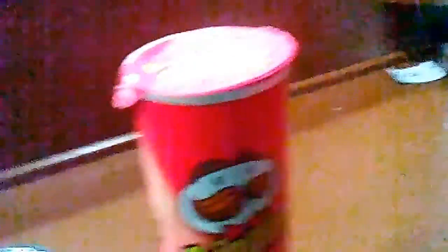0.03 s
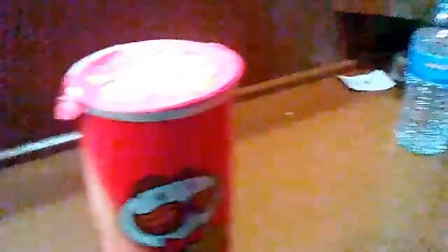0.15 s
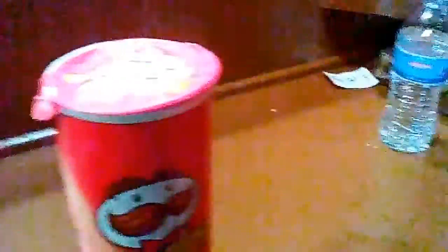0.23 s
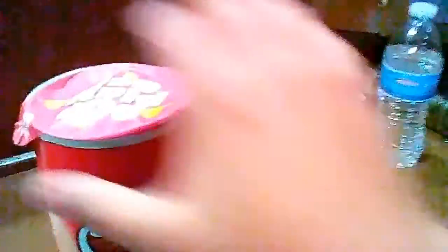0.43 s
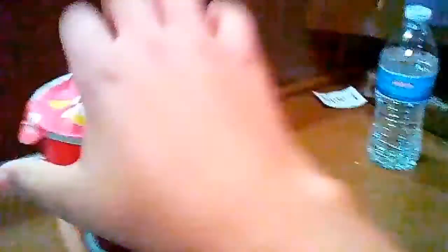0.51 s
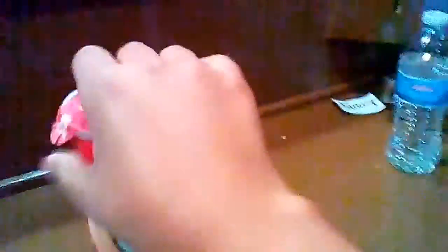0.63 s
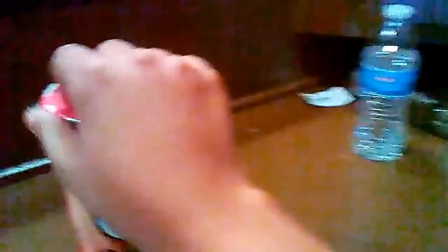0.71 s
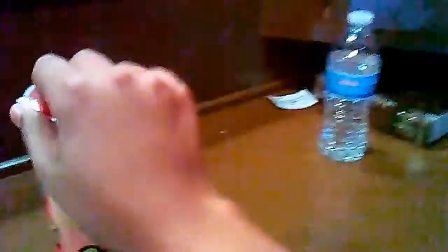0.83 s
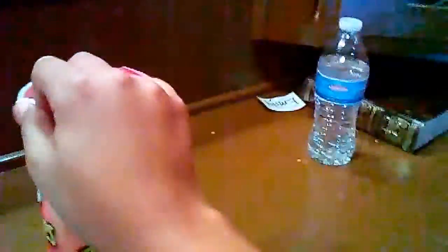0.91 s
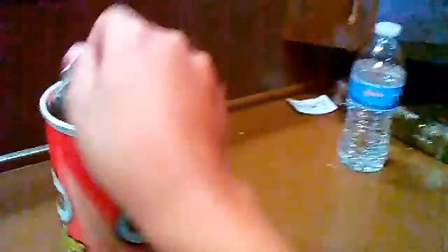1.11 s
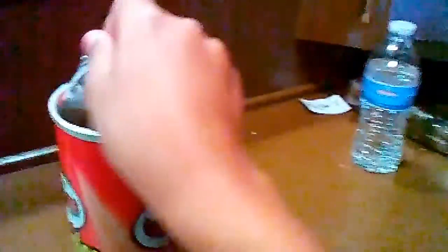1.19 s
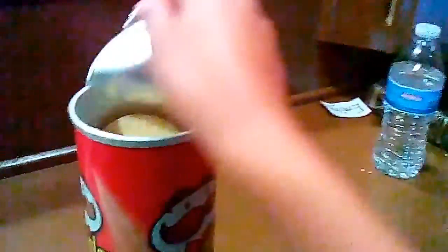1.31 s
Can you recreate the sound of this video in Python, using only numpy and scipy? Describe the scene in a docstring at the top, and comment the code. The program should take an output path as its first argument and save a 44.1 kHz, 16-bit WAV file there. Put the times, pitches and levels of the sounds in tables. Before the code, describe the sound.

Foil seal being ripped from a cardboard can, crinkling and squeaking, followed by clicking plastic and rustle

```python
"""A foil seal is torn off a cardboard snack can, close by in a small room: tiny random bursts crackle in the foil,
ring the stretched seal and drum the wall. Fading tones make the squeaks and the air ringing in the can.
Fingers rub the rim first, as fine slips through resonances; short decaying tones make the wall's hollow knocks.
The plastic lid snaps in sharp clicks of noise and ringing that linger in the room, while the foil rustles faintly.
Light slides of the lid, a soft rumble of the hand and a steady background noise lie underneath."""
import sys
import numpy as np
from scipy import signal
from scipy.fft import rfft, irfft, next_fast_len
from scipy.io import wavfile
from scipy.ndimage import map_coordinates

SR = 44100
rng = np.random.default_rng(int(sys.argv[2]) if len(sys.argv) > 2 else 0)


def waveform_to_disk(signal):
    """Save audio, clipped to [-1, 1], as 16-bit WAV at the path in sys.argv[1]."""
    frames = np.transpose(np.atleast_2d(signal))
    scaled = np.clip(frames, -1, 1) * 32767
    samples = np.round(scaled).astype(np.int16)
    wavfile.write(sys.argv[1], SR, samples)


N = 59535  # length [samples]

# tone colour of the crackling foil: (frequency [Hz], level [dB])
FOIL_COLOUR = [(40, -21), (120, -21), (300, -25), (650, -21), (1000, -13), (1400, -12), (1800, -8.5),
               (2400, -9), (3600, -6), (4500, -6), (5500, 1.5), (6700, -6.5), (7900, -22.5), (9500, -18.5),
               (11500, -26), (13000, -28)]
# resonances of the foil: (frequency [Hz], width [Hz], level [dB])
FOIL_RESONANCES = [(3980, 60, -1.5), (5070, 40, 11.5), (5200, 25, -1), (5580, 137, 0), (5680, 107, -1.5)]
FOIL_RING_DB = -8.5  # foil resonances against the crackle
SNAP_ATTACK_S = 0.00075  # shared by the snaps and their echo


def amp(db):
    """Turn decibels into a gain."""
    return 10 ** (np.asarray(db) / 20)


def unit(x):
    """Scale x to an average strength (rms) of 1."""
    return x / np.sqrt(np.mean(x ** 2) + 1e-20)


def along(points, hz):
    """Read a curve of (frequency [Hz], value) points on a logarithmic frequency axis."""
    point_hz, value = np.transpose(points)
    return np.interp(np.log(hz + 1), np.log(point_hz + 1), value)


def level(points):
    """Gain per sample from (time [s], level [dB]) points, practically silent outside them."""
    s, db = np.transpose(points)
    return amp(np.interp(np.arange(N) / SR, s, db, left=-120, right=-120))


def filtered(x, response):
    """Multiply the spectrum of x by a response of frequency."""
    size = 2 * next_fast_len(N)  # spare room, so that the end does not wrap onto the start
    spectrum = rfft(x, size) * response(np.fft.rfftfreq(size, 1 / SR))
    return irfft(spectrum, size)[..., :N]


def coloured(x, points):
    """Shape x by (frequency [Hz], level [dB]) points with unit power and no sound ahead of its cause."""
    def response(hz):
        cepstrum = irfft(np.log(unit(amp(along(points, hz)))))
        # folding the second half onto the first makes the filter minimum-phase
        cepstrum[1:len(cepstrum) // 2] *= 2
        cepstrum[len(cepstrum) // 2 + 1:] = 0
        return np.exp(rfft(cepstrum))
    return filtered(x, response)


def resonate(x, modes):
    """Send x through side-by-side resonances: (frequency [Hz], width [Hz], level [dB])."""
    def response(hz):
        total = 0
        for k, (centre, width, db) in enumerate(modes):
            damping = 1j * hz * width
            sign = (-1) ** k  # neighbours alternate in sign
            total = total + sign * amp(db) * damping / (centre ** 2 - hz ** 2 + damping)
        return total
    return filtered(x, response)


def wobble(rate):
    """A smooth random curve with the given number of random points a second."""
    knots = rng.standard_normal(int(N * rate / SR) + 4)
    return map_coordinates(knots, [np.arange(N) * rate / SR])


def slips(per_s, spread_db):
    """Tiny irregular stick-slip impulses of uneven size, as a mid (centre) and a side (width) row."""
    size = amp(spread_db * np.minimum(rng.exponential(size=N), 4))
    happens = rng.random(N) < per_s / SR
    return unit(happens * size * rng.choice([-1, 1], (2, N)))


def dying(s, t60, attack):
    """Envelope of a blow at time s [s]: a quick rise, then a fall of 60 dB in t60 [s]."""
    t = np.maximum(np.arange(N) / SR - s, 0)
    return (1 - np.exp(-t / attack)) * 10 ** (-3 * t / t60)


def ring(s, hz, t60, attack):
    """One resonance struck at time s [s]: a dying sine."""
    return dying(s, t60, attack) * np.sin(2 * np.pi * hz * (np.arange(N) / SR - s))


def wavering(hz, rough, flutter):
    """A tone of rms 1 whose strength and phase waver, with a faster flutter in strength."""
    phase = 2 * np.pi * np.cumsum(hz * np.ones(N)) / SR
    strength = 1 + rough * wobble(43.64) + flutter * wobble(160)
    return unit(strength * np.sin(phase) + rough * wobble(45.1) * np.cos(phase))


def centred(x):
    """Put a sound in the mid row only."""
    return np.outer([1, 0], x)


def room(x, wet_db):
    """Add echoes of the mid: a spread-out noise tail in which each frequency dies at its own speed."""
    # how long the echoes last: (frequency [Hz], time to fall 60 dB [s])
    echo_times = [(100, 0.3), (1000, 0.3), (4000, 0.38), (7000, 0.3), (13000, 0.42)]
    delay_s = 0.0039
    hz, t, z = signal.stft(rng.standard_normal((2, SR // 2)), SR, nperseg=256)
    fade = amp(-60 * t / along(echo_times, hz)[:, None])
    tail = signal.istft(z * fade, SR, nperseg=256)[1]
    # silent for one delay, then fading in over another
    tail = tail * np.clip(np.arange(tail.shape[1]) / SR / delay_s - 1, 0, 1)
    echoes = signal.fftconvolve(x[:1], tail / np.linalg.norm(tail[0]), axes=1)[:, :N]
    return x + amp(wet_db) * echoes


def background():
    """Steady random noise with a fixed tone colour."""
    # colour of the background: (frequency [Hz], level [dB])
    floor_colour = [(25, -2), (100, 1), (300, 0.5), (1000, 1), (3000, -9), (6000, 3.5), (8000, -25),
                    (13000, -37)]
    return amp(-63.5) * coloured(rng.standard_normal((2, N)), floor_colour)


def hand():
    """The grip shifts and the can rumbles softly: noise through low resonances."""
    # rumble of the hand on the can: (time [s], level [dB])
    hand_level = [(.02, -87.5), (.08, -64.5), (.17, -67), (.22, -59), (.3, -57), (.42, -50), (.5, -64.5),
                  (.66, -69), (.76, -102), (.92, -75), (1.08, -54.5), (1.14, -101)]
    # its resonances: (frequency [Hz], width [Hz], level [dB])
    hand_modes = [(55.7, 29, -5.5), (101, 33, 3.5), (158, 64, 3)]
    return level(hand_level) * unit(resonate(rng.standard_normal((2, N)), hand_modes))


def lid_slides():
    """Plastic glides on the rim: fine slips make a thin hiss that swells fast and fades."""
    # slides of the lid: (start [s], length [s], level [dB])
    slides = [(-.03, 0.19, -57.5), (0.746, 0.17, -42.5)]
    # resonances of the hiss: (frequency [Hz], width [Hz], level [dB])
    slide_modes = [(1830, 490, -9.5), (3150, 210, -14.5), (5540, 570, -0.5), (6150, 380, 3),
                   (9850, 220, -12.5)]
    stroke = np.zeros(N)
    for s, length, db in slides:
        stroke += level([(s, db - 6.0), (s + 0.28 * length, db),
                         (s + 0.65 * length, db - 11.5), (s + length, db - 16)])
    return stroke * unit(resonate(slips(per_s=8000, spread_db=-1.5), slide_modes))


def foil_rustle():
    """Loose foil crinkles softly in tiny impulses and rings faintly."""
    # rustling: (time [s], level [dB])
    rustle_level = [(.87, -81), (.9, -38), (.94, -59), (.98, -33.5), (1.02, -62), (1.05, -50),
                    (1.14, -45.5), (1.2, -91), (1.25, -52.5), (1.275, -60), (1.288, -45), (1.308, -45),
                    (1.35, -52.5)]
    crinkles = slips(per_s=2900, spread_db=0.5)
    ringing = amp(FOIL_RING_DB) * unit(resonate(crinkles, FOIL_RESONANCES))
    return level(rustle_level) * (unit(coloured(crinkles, FOIL_COLOUR)) + ringing)


def rim_rub():
    """Fine slips ring the rim, whose resonances rise slightly as the grip slides."""
    # rubbing on the rim: (time [s], level [dB])
    rub_level = [(0, -58.5), (.035, -55), (.055, -42.5), (.085, -35.5), (.115, -33), (.16, -36.5),
                 (.19, -36.5), (.23, -67)]
    # resonances of the rim: (frequency [Hz], width [Hz], level [dB])
    rim_modes = [(590, 85, -8.5), (928, 46, -1), (1250, 97, 3.5), (1750, 104, -5.5), (2336, 240, -4),
                 (4096, 155, -1.5), (5400, 110, 5.5), (6260, 480, -14), (6890, 270, -9)]
    glide_per_s, waver = 0.08, 0.0018  # fractions of the pitch
    rub = unit(resonate(slips(per_s=5000, spread_db=2.0), rim_modes))
    t = np.arange(N) / SR - rub_level[4][0]
    # reading the sound ever faster raises its pitch
    position = np.cumsum(1 + glide_per_s * t + waver * wobble(42.0))
    return level(rub_level) * np.array([map_coordinates(row, [position]) for row in rub])


def snap_echo():
    """The last strong snap's resonances linger in the room: dying coloured noise."""
    # resonances that linger: (frequency [Hz], width [Hz], level [dB])
    echo_modes = [(1240, 90, -1), (2330, 120, -0.5), (3460, 110, 1), (3940, 300, 1.5), (6160, 590, -11)]
    echo = unit(resonate(rng.standard_normal((2, N)), echo_modes))
    return amp(-32.5) * dying(s=1.037, t60=0.36, attack=SNAP_ATTACK_S) * echo


def snaps():
    """Each snap of foil or lid is a jolt, a short crack of noise and a low and a high ring."""
    # snaps: (time [s], crack [dB], low ring [Hz], its level [dB], high ring [Hz], its level [dB])
    snap_list = [(0.322, -41, 1280, -26, 4270, -17), (0.3613, -19, 1366, -21, 5500, -36),
                 (.398, -23.5, 1416, -23.5, 5620, -16), (0.8918, -35, 1140, -34, 5250, -43),
                 (0.898, -21.5, 768, -20.5, 3040, -19), (0.9006, -44, 1196, -22.5, 1880, -25),
                 (0.9136, -18.5, 1220, -23.5, 5460, -19.5), (0.9427, -36, 1240, -33, 5260, -30),
                 (0.9562, -13.5, 1136, -33, 5470, -11.5), (0.975, -32, 1430, -27, 3150, -24),
                 (1.0366, -12, 1179, -12, 3720, -13), (1.042, -36, 2210, -37, 3810, -21)]
    # tone colour of jolt and crack: (frequency [Hz], level [dB])
    crack_colour = [(50, -14), (200, -12), (600, -15), (1000, -4), (3000, -3.5), (4500, -1), (6200, 4),
                    (7000, -2), (7900, -13), (10000, -13.5), (13000, -24)]
    crack_t60, low_t60, high_t60 = 0.024, 0.022, 0.02  # seconds
    partner_ratio, partner_db = 1.08, -5  # a close second tone over each high ring
    jolt_db = 11.5  # one-sample jolt over the crack
    crack_envelope = sum(amp(db) * dying(s, crack_t60, SNAP_ATTACK_S) for s, db, *_ in snap_list)
    cracks = crack_envelope * rng.choice([-1, 1], (2, N))
    rings = np.zeros(N)
    for s, db, low_hz, low_db, high_hz, high_db in snap_list:
        cracks[0, round(s * SR)] += amp(db + jolt_db)
        rings += amp(low_db) * ring(s, low_hz, low_t60, SNAP_ATTACK_S)
        high = ring(s, high_hz, high_t60, SNAP_ATTACK_S)
        partner = ring(s, high_hz * partner_ratio, high_t60, SNAP_ATTACK_S)
        rings += amp(high_db) * (high + amp(partner_db) * partner)
    return coloured(cracks, crack_colour) + centred(rings)


def wall_buckles():
    """The cardboard gives with short hollow knocks: dying tones with the deep bass thinned out."""
    # buckles of the wall: (time [s], level [dB], pitch [Hz])
    buckles = [(.3095, -17, 370), (.323, -23.5, 348), (.360, -12, 493), (.396, -19.5, 638),
               (1.021, -29, 774), (1.086, -32.5, 550), (1.235, -46, 407)]
    knocks = sum(amp(db) * ring(s, hz, t60=0.021, attack=0.00055) for s, db, hz in buckles)
    high_pass = signal.butter(2, 170, "high", fs=SR, output="sos")  # cutoff in Hz
    return centred(signal.sosfilt(high_pass, knocks))


def can_air():
    """The air column in the can sings unevenly while the foil tears, its pitch sinking slightly."""
    # ringing of the air: (time [s], level [dB])
    air_level = [(.394, -39), (.405, -19.5), (.419, -27.5), (.431, -21.5), (.445, -30), (.459, -21.5),
                 (.474, -27.5), (.51, -25.5), (.537, -42), (.565, -30.5), (.615, -50.5), (.635, -37),
                 (.685, -60.5), (.76, -56.5), (.85, -95)]
    t = np.arange(N) / SR - air_level[1][0]
    pitch_hz = 902 - 35 * t
    return centred(level(air_level) * wavering(pitch_hz, rough=0.19, flutter=0.23))


def squeaks():
    """Thin rough tones where the stretched seal sticks and slips."""
    # squeaks: (start [s], length [s], level [dB], pitch [Hz])
    squeak_list = [(0.203, 0.17, -37, 1863), (0.23, 0.063, -35, 5560), (0.485, 0.21, -40.5, 3120),
                   (0.615, 0.11, -48, 4000), (0.627, 0.088, -39.5, 5380)]
    total = np.zeros(N)
    for s, length, db, hz in squeak_list:
        fade = level([(s, db + 4), (s + 0.11 * length, db), (s + length, db - 18.5)])
        total += fade * wavering(hz, rough=0.68, flutter=0.25)
    return centred(total)


def foil_tear():
    """Tiny bursts of the tearing seal crackle in the foil, ring the seal and drum the wall, scraped later."""
    # tearing of the foil: (time [s], level [dB])
    tear_level = [(.15, -67), (.19, -40), (.207, -30), (.24, -25), (.26, -27), (.28, -31), (.31, -28),
                  (.33, -23), (.353, -27.5), (.367, -23.5), (.386, -27), (.405, -22), (.432, -19.5),
                  (.452, -23.5), (.52, -25.5), (.565, -31), (.6, -36), (.66, -38.5), (.69, -45),
                  (.76, -53.5)]
    # ringing of the stretched seal: (time [s], level [dB])
    seal_level = [(.28, -47), (.33, -29), (.37, -38), (.42, -36), (.5, -28), (.56, -34), (.62, -47.5),
                  (.7, -54)]
    # the wall drums under the pull, then, after 0.9 s, the lid scrapes faintly on it:
    # (time [s], level [dB])
    wall_level = [(.19, -48.5), (.28, -41), (.33, -30.5), (.352, -30), (.41, -29.5), (.46, -40.5),
                  (.53, -41.5), (.62, -51.5), (.7, -81), (.88, -78), (.92, -56.5), (.985, -49.5),
                  (1.07, -54.5), (1.13, -71)]
    # resonances of the seal, then of the wall: (frequency [Hz], width [Hz], level [dB])
    seal_modes = [(932, 47, 0), (1087, 39, 0.5), (1440, 215, -8), (1654, 17, 5.5), (1748, 120, -6.5),
                  (1988, 21, 4), (2497, 49, -7)]
    wall_modes = [(307, 165, -10), (428, 71, 2), (522, 126, -0.5), (625, 220, 0.5)]
    # the crackle's strength flickers at random
    bursts = slips(per_s=3500, spread_db=2.0) * amp(1.6 * wobble(170))
    foil = unit(coloured(bursts, FOIL_COLOUR))
    foil = foil + amp(FOIL_RING_DB) * unit(resonate(bursts, FOIL_RESONANCES))
    seal = level(seal_level) * unit(resonate(bursts, seal_modes))
    wall = level(wall_level) * unit(resonate(bursts, wall_modes))
    return level(tear_level) * foil + seal + wall


def scene():
    """Add up all sounds, with room echoes on scrapes and hits; only the treble is wide."""
    # stereo width: (frequency [Hz], side level [dB])
    side_width = [(3800, -68), (4300, -12), (5000, -11.5), (6000, -6.5), (9000, -5), (13000, -6)]
    scrapes = room(rim_rub() + foil_tear() + squeaks() + lid_slides() + foil_rustle(), wet_db=-7.5)
    hits = room(snaps() + wall_buckles(), wet_db=-8.5)
    mid, side = scrapes + hits + snap_echo() + can_air() + hand() + background()
    side = filtered(side, lambda hz: amp(along(side_width, hz)))
    return np.array([mid + side, mid - side])  # left, right


def record(dry):
    """Cut the sound steeply above the recorder's band limit of 13150 Hz."""
    return filtered(dry, lambda hz: 1 / np.sqrt(1 + (hz / 13150) ** 240))


dry = scene()
out = record(dry)
waveform_to_disk(out)
```